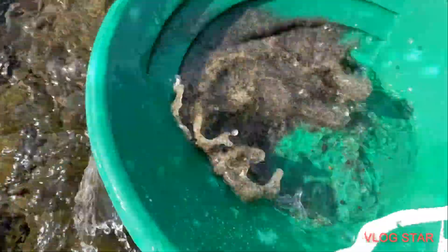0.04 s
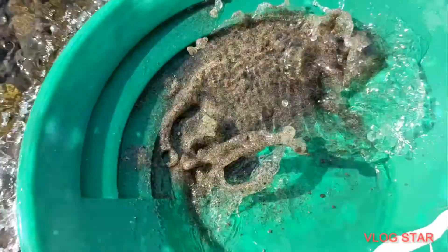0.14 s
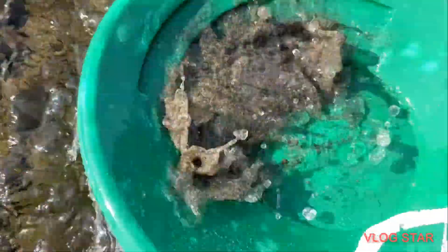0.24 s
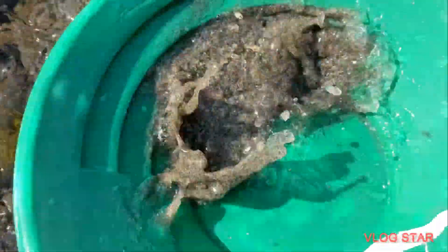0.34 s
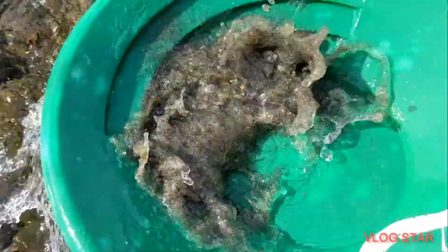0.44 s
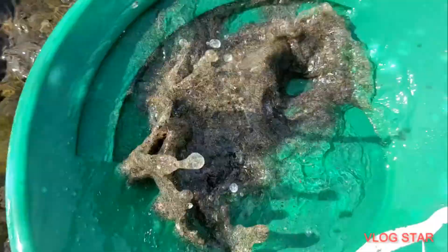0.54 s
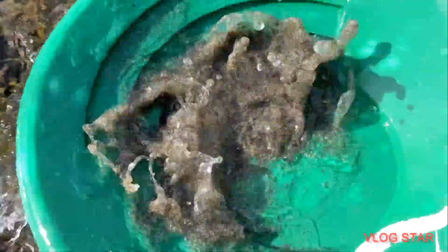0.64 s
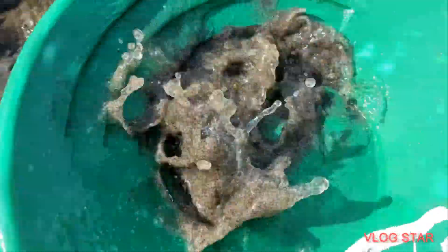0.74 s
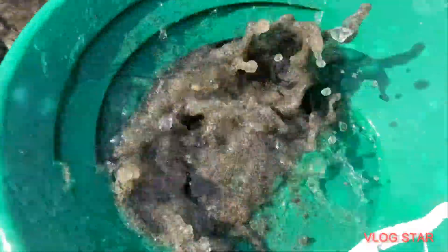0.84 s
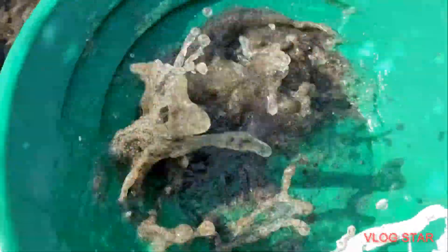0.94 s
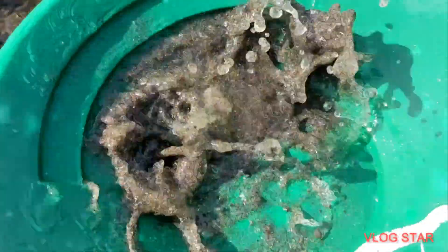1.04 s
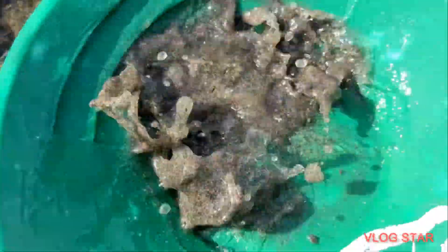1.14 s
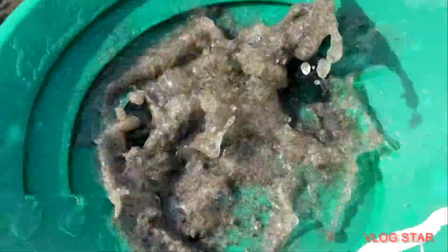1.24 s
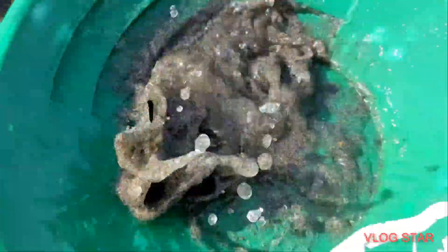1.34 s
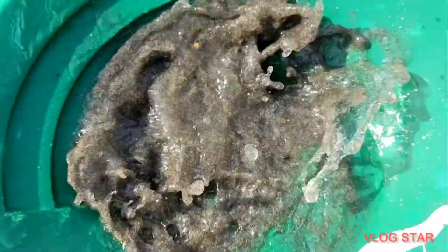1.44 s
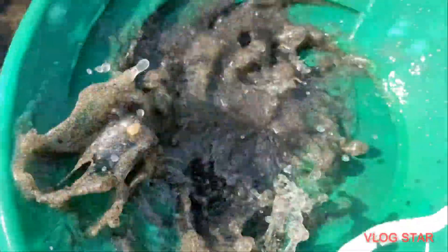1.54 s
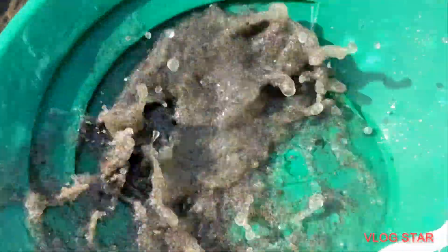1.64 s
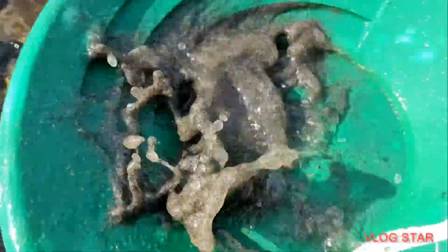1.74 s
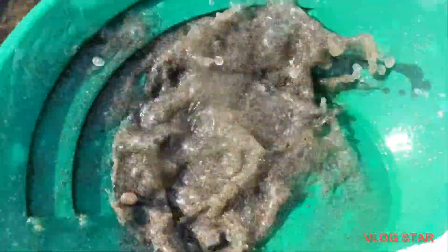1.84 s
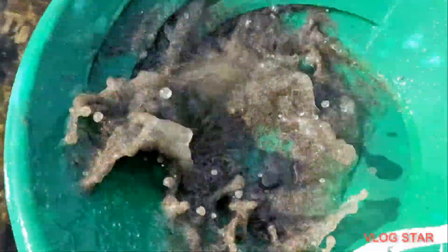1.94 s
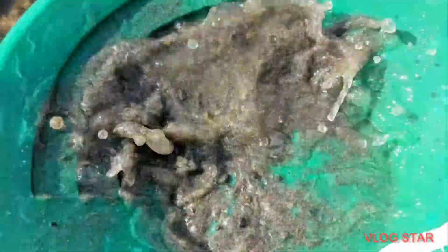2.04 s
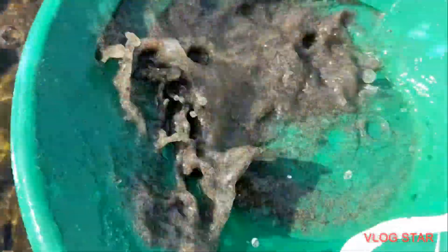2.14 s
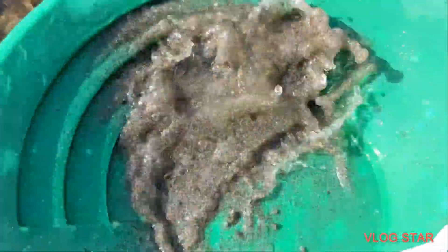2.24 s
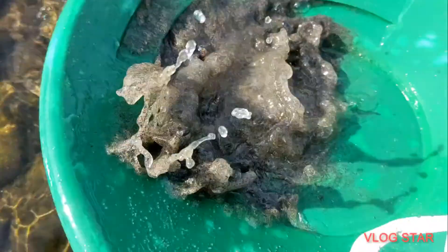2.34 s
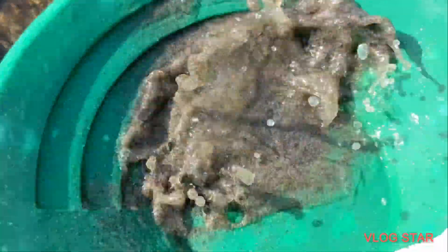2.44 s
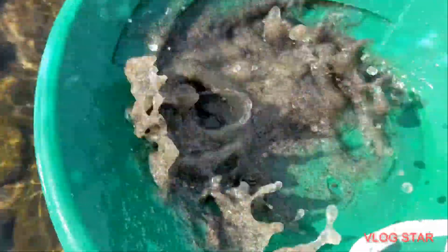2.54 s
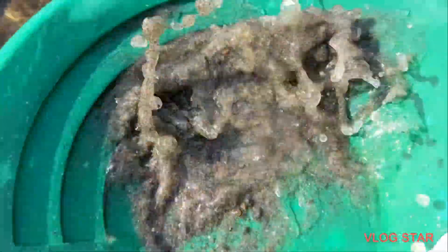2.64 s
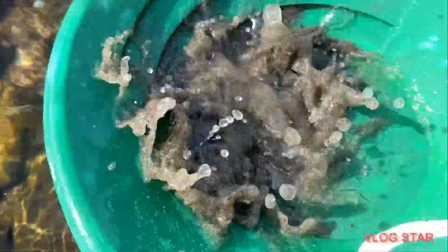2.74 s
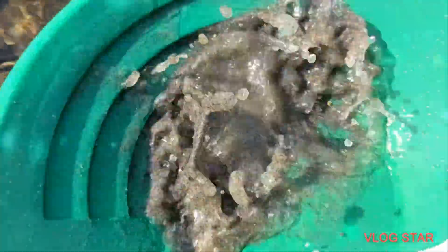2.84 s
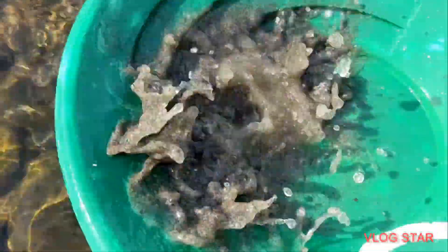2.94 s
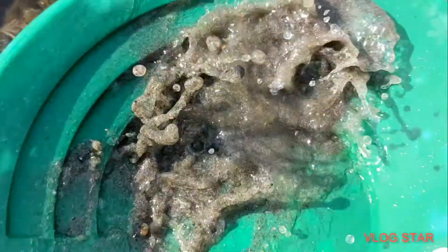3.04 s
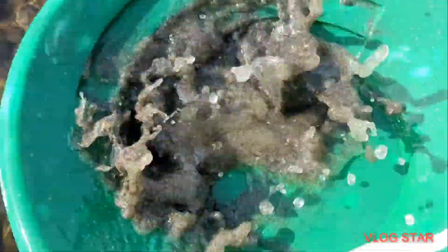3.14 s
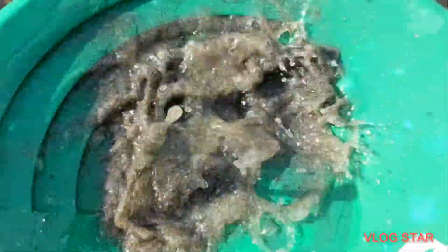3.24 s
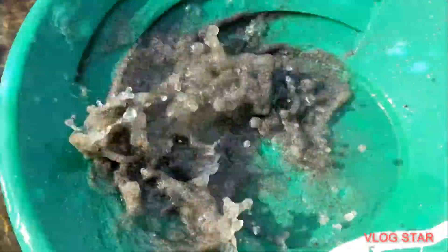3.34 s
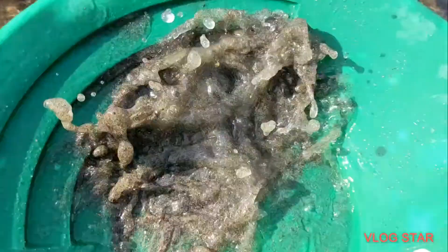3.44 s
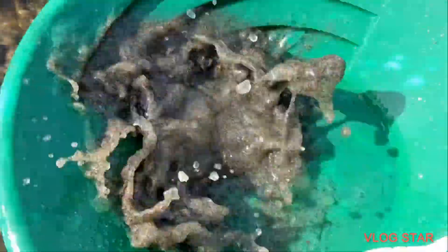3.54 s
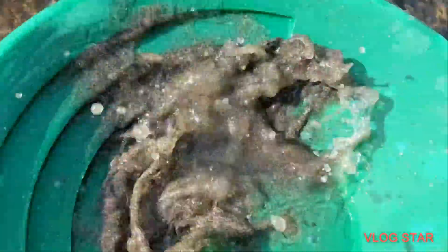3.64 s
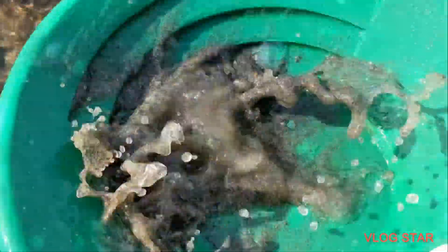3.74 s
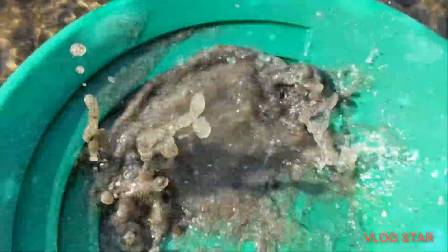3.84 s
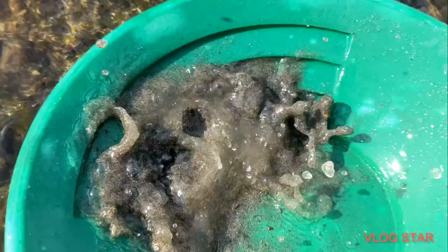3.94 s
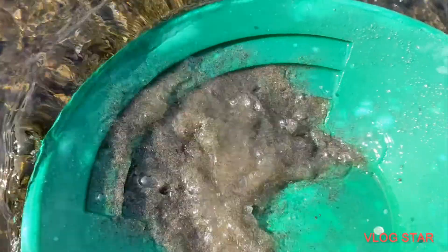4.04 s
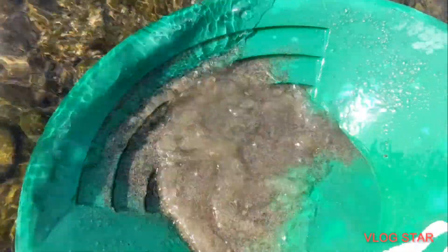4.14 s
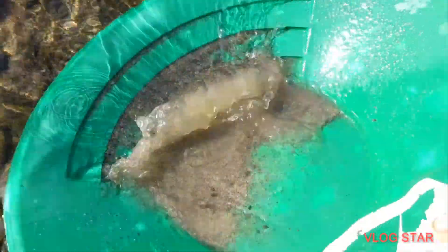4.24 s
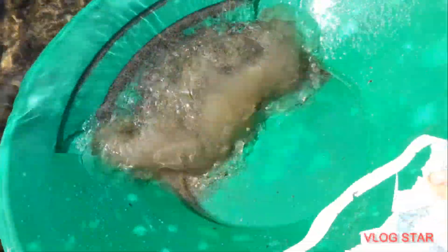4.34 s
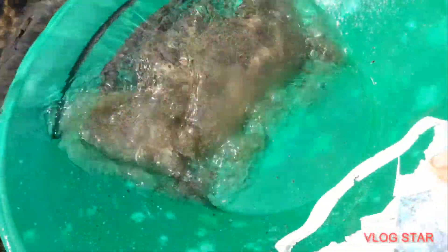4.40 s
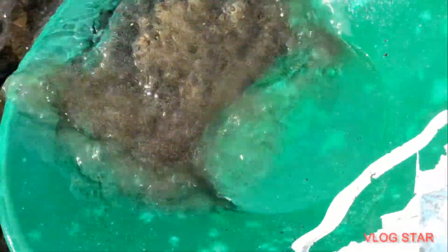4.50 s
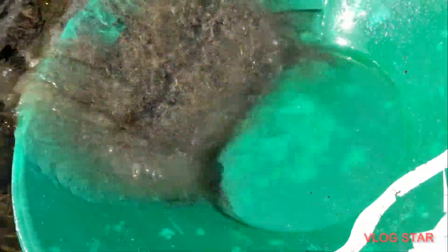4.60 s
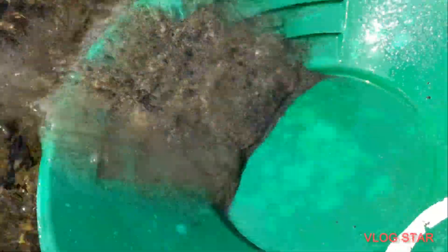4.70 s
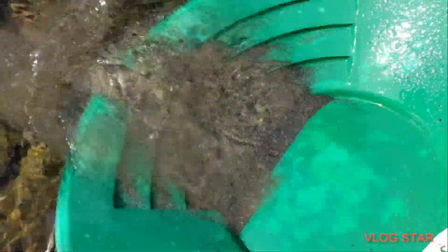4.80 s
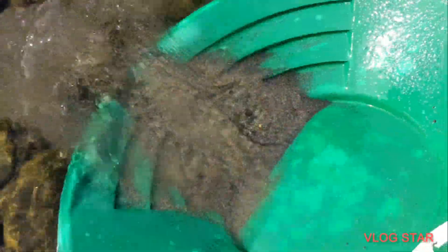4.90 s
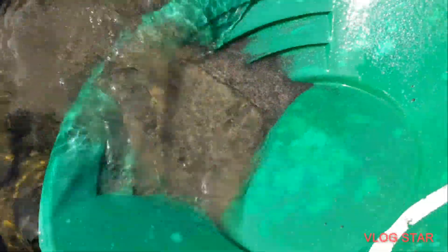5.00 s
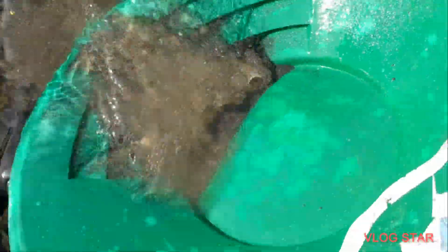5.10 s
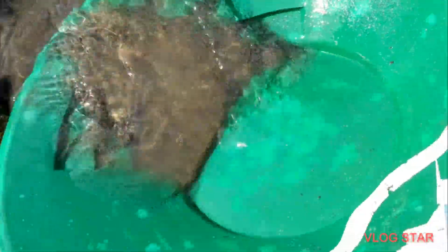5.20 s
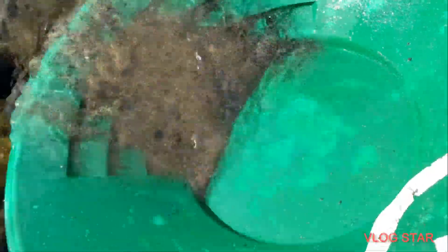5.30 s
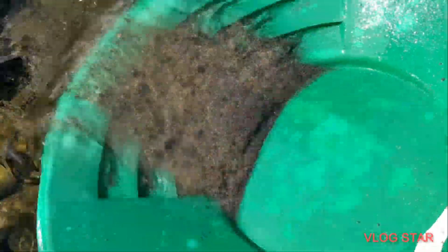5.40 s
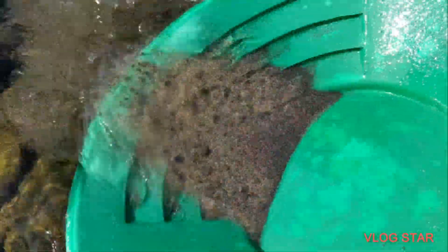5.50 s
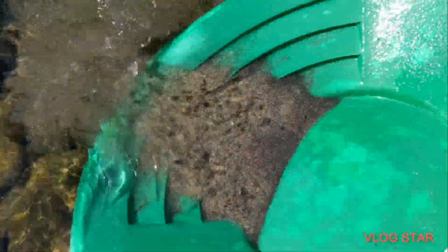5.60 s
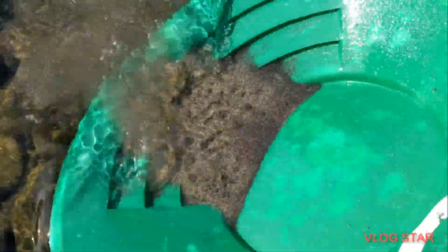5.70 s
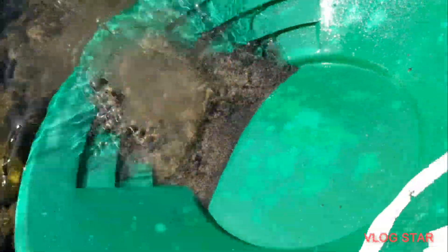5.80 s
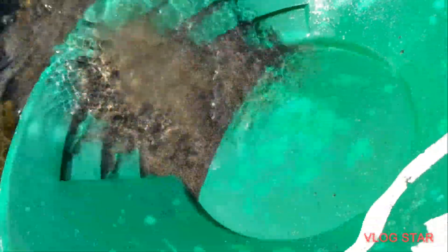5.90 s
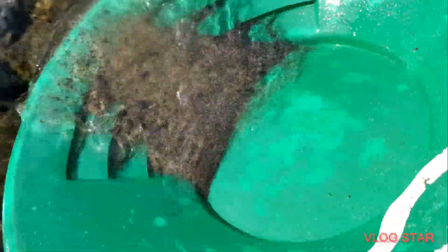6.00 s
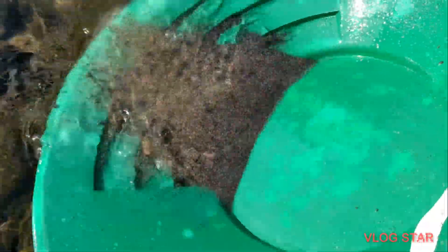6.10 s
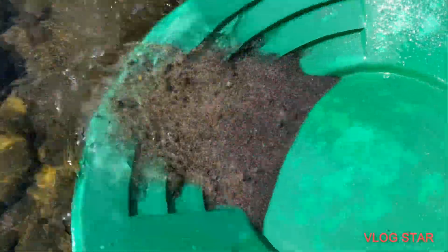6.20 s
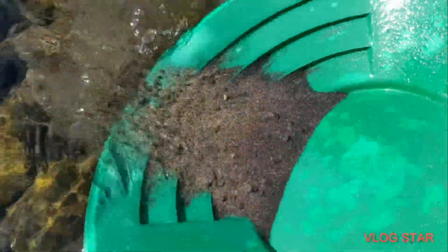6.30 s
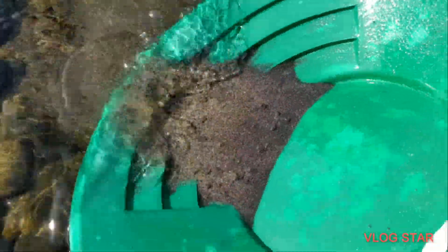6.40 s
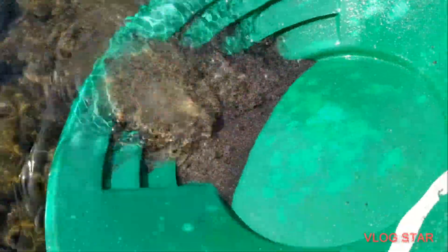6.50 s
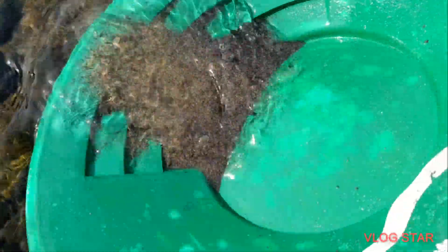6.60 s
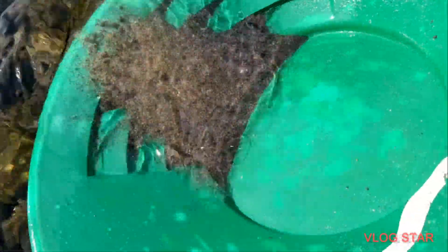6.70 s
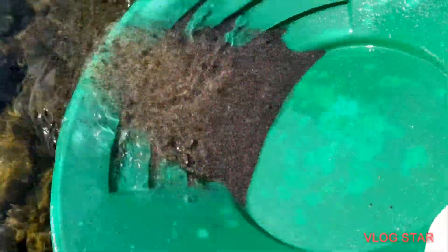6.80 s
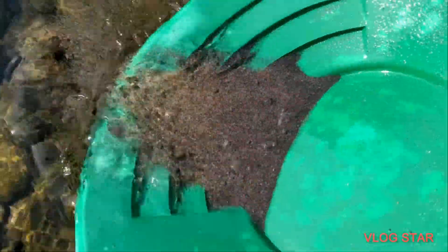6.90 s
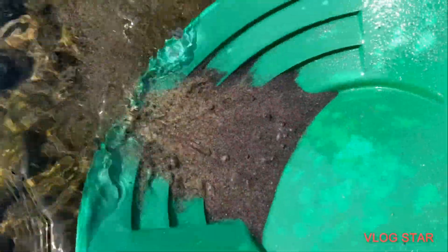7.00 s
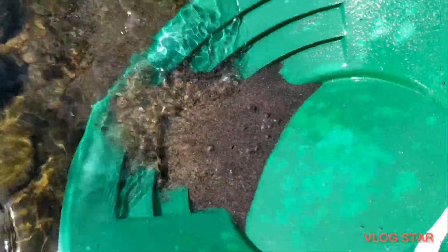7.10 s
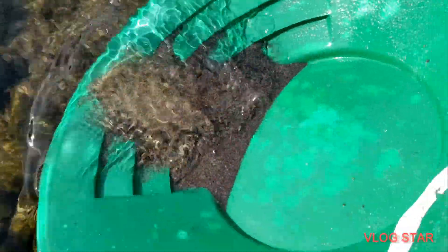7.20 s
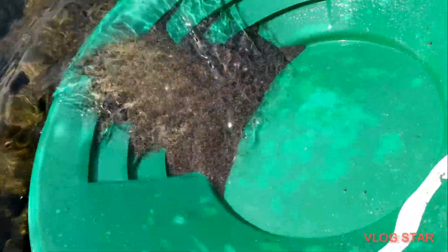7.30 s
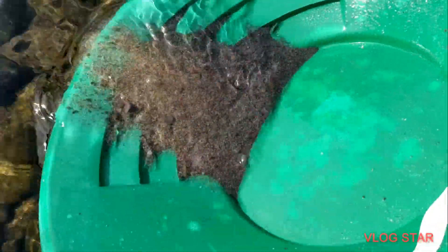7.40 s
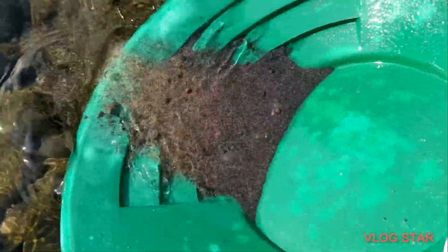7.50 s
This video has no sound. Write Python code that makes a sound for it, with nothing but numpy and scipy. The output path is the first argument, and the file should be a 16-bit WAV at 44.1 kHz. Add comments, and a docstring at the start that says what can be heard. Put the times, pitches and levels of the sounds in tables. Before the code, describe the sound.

Gravelly slurry is shaken hard in a plastic pan, splashing and popping with bubbles, then gently dipped in a hissing river as wind buffets the microphone.

```python
"""A river hisses and a breeze buffets two microphone ports, mostly the right one, as gravelly slurry sloshes.
A plastic gold pan of sand and water is shaken for about four seconds, then dipped gently in the river.
Water and wind are coloured noise; bubbles are short dying tones, single or in swarms.
Slaps, knocks and grit ticks are bursts of noise; hollows under waves give gliding notes."""
import sys
import numpy as np
from scipy import signal
from scipy.io import wavfile
from scipy.ndimage import uniform_filter1d

SR = 44100
rng = np.random.default_rng(int(sys.argv[2]) if len(sys.argv) > 2 else 0)


def store_pcm(level_fs):
    """Save levels as 16-bit WAV."""
    pcm = np.round(np.clip(level_fs, -1, 1) * 32767).astype(np.int16)
    wavfile.write(sys.argv[1], SR, np.atleast_2d(pcm).T)


N = 332947

# Colours of the noise layers. Each row: frequency in Hz, gain in dB.
RIVER_COLOUR = [(150, -12), (480, 8), (850, -2.5), (1150, 11), (1430, -4), (1800, 2), (3000, 1.5),
                (4400, -3.5), (5700, -12), (6800, -3), (8500, -10), (12000, -12), (14000, -12),
                (16000, -14)]
RUMBLE_COLOUR = [(20, -59), (35, -18), (55, -7.5), (80, -1.5), (140, 2), (200, -1), (300, -15.5),
                 (500, -31), (1000, -77.5)]
FLUTTER_COLOUR = [(80, -32.5), (160, -2), (240, 3), (340, -4), (500, -15), (800, -40), (1600, -50)]
LARGE_COLOUR = [(250, -11.5), (420, -7.5), (560, -5), (800, -2.5), (1200, -6.5), (1600, -11.5),
                (2600, -4.5)]
SMALL_COLOUR = [(800, -24.5), (1300, -4.5), (1900, 0.5), (2700, 0), (3800, -2.5), (5000, -11.5),
                (8000, -21)]
SPRAY_COLOUR = [(2800, -4), (4500, 2.5), (6000, 2), (7200, 4.5), (9000, 1.5), (11000, -2), (13500, -3),
                (16000, -3.5)]
SLAP_COLOUR = [(200, -26.5), (420, 3.5), (650, 7), (1300, 3.5), (2100, 3), (3000, 0), (4500, -8.5),
               (8000, -11.5), (16000, -16)]

# Steady breeze on the exposed right port. Each row: time in seconds, wind strength in dB.
BREEZE = [(0, -36), (.3, -45), (.65, -39.5), (.9, -41), (1.2, -39.5), (1.8, -38), (1.95, -44), (2.5, -44),
          (3.0, -37.5), (3.4, -43), (3.9, -40), (4.4, -52.5), (4.65, -54), (5.0, -46.5), (5.4, -38.5),
          (5.8, -42.5), (6.1, -46), (6.5, -45.5), (6.9, -45), (7.15, -46.5), (7.55, -36)]
# Gusts that swell and die on the right port.
# Each row: peak time in seconds, length in seconds, wind strength in dB.
GUSTS = [(0.01, 0.13, -33.5), (0.355, 0.034, -32), (0.549, 0.046, -28), (1.204, 0.12, -34),
         (1.44, 0.12, -34), (1.654, 0.25, -36), (1.813, 0.092, -31), (3.05, 0.051, -28),
         (3.158, 0.076, -34), (3.362, 0.28, -29.5), (3.526, 0.054, -25.5), (3.644, 0.11, -27.5),
         (3.71, 0.039, -31), (4.114, 0.047, -38), (4.407, 0.34, -35.5), (4.76, 0.19, -36.5),
         (4.887, 0.094, -35), (5.128, 0.047, -36.5), (5.197, 0.06, -33), (5.514, 0.21, -49),
         (5.669, 0.12, -26.5), (5.898, 0.11, -39), (5.987, 0.11, -32.5), (6.067, 0.018, -33.5),
         (6.221, 0.16, -31.5), (6.303, 0.13, -35.5), (6.692, 0.13, -41), (7.056, 0.094, -30.5),
         (7.3, 0.44, -36.5)]
# Gusts that reach round to the sheltered left port.
# Each row: peak time in seconds, length in seconds, wind strength in dB.
LEE_GUSTS = [(.04, 0.091, -44), (0.7, 0.074, -48), (3.086, 0.24, -50), (4.15, 0.15, -48),
             (4.428, 0.19, -43), (5.95, 0.82, -53.5), (7.316, 0.13, -50)]
LEE_DB = -61.5  # strength of the steady breeze on the left port
# Sudden eddies on the right port.
# Each row: start in seconds, width of the dying bell curve in seconds, level in dB, first pitch in Hz.
EDDIES = [(0.539, 0.0048, -15.5, 383), (0.55, .006, -20, 229), (1.243, 0.0056, -15, 340),
          (3.283, .005, -18, 360), (3.344, 0.0038, -20, 400), (3.422, 0.0044, -20, 360),
          (3.506, 0.0048, -21, 368), (3.643, 0.0039, -9.5, 467), (3.717, 0.0084, -14, 234),
          (4.098, 0.014, -23, 300), (4.219, 0.0086, -25.5, 260), (4.358, 0.008, -21, 300),
          (4.761, 0.0087, -20, 217), (4.878, 0.013, -18.5, 169), (5.417, 0.0068, -24.5, 400),
          (5.52, 0.0047, -16, 290), (5.655, 0.011, -15.5, 555), (5.673, 0.0058, -19, 556),
          (5.68, 0.013, -14.5, 220), (5.861, 0.0062, -28, 348), (5.964, 0.0074, -20, 298),
          (6.063, 0.007, -15.5, 360), (6.164, 0.0042, -24, 470), (6.18, 0.0046, -25, 490),
          (6.262, 0.005, -23, 470), (6.28, 0.0052, -24, 260), (6.314, 0.0066, -13, 330),
          (6.343, 0.0052, -19.5, 403), (7.328, .005, -29.5, 506)]
EDDY_SAG_PER_S, EDDY_ROUGH = 48, 0.3  # exponential sinking of the pitch, and share of noise

# Each shake sends a surge of slurry across the pan.
# Each row: start in seconds, length in seconds, level in dB, extra large bubbles in dB, extra spray in dB.
SHAKES = [(.02, 0.35, -36.5, -6, 0.5), (.335, 0.14, -37, 2, -3.5), (.48, 0.12, -32, 0, -0.5),
          (.63, 0.18, -37, 3, -2), (.83, 0.17, -40, 9, -2), (1.06, 0.24, -32.5, 0, -1.5),
          (1.27, 0.14, -32.5, -1.5, 0), (1.47, 0.23, -34, 0, 0.5), (1.72, 0.094, -32, -0.5, -0.5),
          (1.885, 0.041, -31.5, -3.5, -2.5), (1.98, 0.058, -31.5, -1, -13), (2.085, 0.13, -38.5, 8.5, -11),
          (2.30, 0.14, -38, 3, -6), (2.53, 0.1, -36, 1, -1.5), (2.70, 0.047, -33, 3, -2),
          (2.78, 0.17, -42, -6, 2), (2.94, 0.127, -35, 3, -6), (3.15, 0.062, -30, 4.5, 3.5),
          (3.235, 0.036, -31.5, 8, 3), (3.29, 0.11, -33.5, -9, 0), (3.43, 0.064, -38.5, -14, 2.5),
          (3.54, 0.23, -32.5, -16, -1.5), (3.74, 0.15, -34, 0.5, -12), (3.945, 0.029, -34, 6.5, 2),
          (4.05, 0.086, -32.5, -11, -13)]
# Each dip lets a thin wave wash over the sand.
# Each row: start in seconds, length in seconds, level in dB, extra large bubbles in dB, extra spray in dB.
DIPS = [(4.16, 0.032, -48, -7, -17), (4.178, 0.16, -54.5, 13, -15), (4.306, 0.093, -43, -6, -5),
        (4.42, 0.11, -52, 7.5, -24), (4.688, 0.17, -50.5, -11, 3.5), (4.852, 0.091, -54.5, -9, 3),
        (5.185, 0.12, -51.5, -3, -3), (5.424, 0.07, -49, -9, -2), (5.582, 0.12, -48.5, -14, -9),
        (5.738, 0.071, -53.5, -1, -1), (5.86, 0.163, -51.5, -16, -0.5), (6.193, 0.21, -52, -18, 0.5),
        (6.444, 0.026, -58.5, 17, -10), (6.927, 0.2, -52.5, -6, 3), (7.18, 0.12, -55, -7, -3)]
# every surge swells fast, climbs slightly and drains away
ATTACK_S, CLIMB_DB_PER_S, RELEASE_S = 0.0027, 4, 0.015
# Moments when the water hangs before it falls back.
# Each row: centre in seconds, depth in dB (negative lifts the level a little).
LULLS = [(.067, 4), (.562, -0.5), (.452, 1.5), (1.035, 0), (1.568, 5), (1.671, 8), (1.845, 4), (2.405, -1),
         (2.485, 7), (3.105, 4), (3.505, 4.5), (4.02, 1.5), (4.113, 4)]
LULL_S = 0.02
SHAKING_ENDS_S, CHURN_DB = 4.16, -39.5  # water keeps moving between shakes
# Water trickling over the riffles; its first level also lies faintly under the shaking.
# Each row: time in seconds, level in dB, extra spray in dB.
TRICKLE = [(4.2, -55, -2.5), (4.45, -50, -10), (4.57, -49.5, -5), (4.63, -50.5, -3), (5.0, -52, 2.5),
           (5.35, -53, -0.5), (5.72, -58, -5), (5.95, -58, -2), (6.2, -57, 7.5), (6.42, -56, -11),
           (6.6, -58, 3.5), (6.8, -56, 5.5), (7.15, -58.5, 0), (7.37, -62, 1), (7.55, -56.5, 3)]
LARGE_DB, SMALL_DB, SPRAY_DB = -3, .5, 1.5  # shares of large bubbles, small bubbles and spray
# sparser air pockets that ring on top of the swarms
PLOPS_PER_S, PLOP_CYCLES, PLOPS_DB = 40, 3.2, -8.5
# small knocks in the moving slurry: rate, decay time, spread of strength and share
KNOCKS_PER_S, KNOCK_S, KNOCK_SPREAD_DB, KNOCKS_DB = 130, .0013, 4.6, -3.5

# Water slapping the wall. Each row: start in seconds, level in dB, decay time in seconds,
# left minus right in dB.
SLAPS = [(0.027, -22.5, 0.0033, 0), (0.345, -24.5, 0.026, 22), (0.423, -35, 0.02, 10),
         (0.515, -25.5, 0.012, 1), (0.57, -26.5, 0.013, -2), (0.763, -27, 0.01, -2), (0.863, -29, 0.057, 2),
         (0.973, -30, .009, 2), (1.341, -21.5, 0.0048, 4), (1.574, -23, 0.0038, -3),
         (1.618, -24, 0.0052, 1), (1.72, -25, 0.0069, -5), (1.76, -20, 0.0039, -9),
         (2.01, -16.5, 0.0057, 6), (2.085, -20.5, 0.0044, -1), (2.098, -20.5, .0046, 7),
         (2.157, -17.5, 0.0054, 2), (2.193, -24.5, 0.0074, 0), (2.235, -23, 0.0033, 1),
         (2.3372, -21.5, 0.0033, -4), (2.378, -20.5, 0.0037, 4), (2.421, -24.5, 0.017, -2),
         (2.435, -26, 0.013, 6), (2.77, -22.5, 0.0051, -2), (3.034, -21.5, 0.0062, -1),
         (3.057, -20.5, 0.0047, 7), (3.185, -18, 0.0086, -7), (3.199, -21, 0.015, 11),
         (3.876, -28, .003, 2), (4.071, -22.5, 0.0053, 1), (4.1219, -14.5, 0.0021, -6),
         (4.146, -29, 0.0072, 3), (4.3108, -32, 0.0027, 0), (4.476, -30.5, 0.0061, 2),
         (4.782, -39, 0.0023, 1), (6.335, -54, 0.0039, 4), (7.0, -37, .003, 5)]
# The loudest single bubbles. Each row: start in seconds, level in dB, starting pitch in Hz,
# decay setting in seconds, left minus right in dB.
BUBBLES = [(0.029, -9, 1390, 0.0016, 5), (0.1, -1.5, 1210, 0.0021, -7), (0.103, -18, 743, 0.006, 6),
           (0.108, -15, 2300, .004, 3), (0.139, -10, 3580, 0.0029, 9), (0.1566, -3.5, 2270, 0.0025, 5),
           (0.1905, -10.5, 3480, 0.0014, 24), (0.2214, -3, 1190, 0.003, 1), (0.299, -23, 1220, .003, 3),
           (0.314, -24, 990, 0.0034, 1), (0.445, -19.5, 1050, 0.0049, 5), (0.344, -5, 2730, 0.0016, 10),
           (0.349, -21, 900, 0.0069, 5), (0.368, -14, 1100, 0.0035, 7), (0.422, -8, 2410, 0.0026, 10),
           (0.5155, -10.5, 1610, 0.0031, -5), (0.523, -17, 2400, 0.0049, 0), (0.5712, -7, 940, 0.0043, 7),
           (0.577, -11, 3200, 0.0016, -1), (0.6655, -9, 1840, 0.0032, 0), (0.699, -12, 1210, 0.0022, -16),
           (0.571, -19, 550, 0.0036, 1), (0.7035, -8.5, 3530, 0.0017, 0), (0.7305, -19, 1507, 0.0014, -4),
           (0.7645, -17, 2410, .002, -2), (0.7702, -18, 792, 0.0078, 4), (0.85, -10.5, 2070, .0018, 3),
           (0.8632, -7, 2290, 0.002, 13), (0.8669, -22, 847, 0.015, 4), (0.9046, -18, 593, 0.0041, 1),
           (0.9716, -14.5, 754, 0.0089, 2), (1.0784, -6.5, 1246, 0.0042, 4), (1.1265, -5, 1100, 0.0026, 8),
           (1.172, -12.5, 1330, 0.003, 5), (1.385, -8, 2300, 0.0011, 1), (1.1735, -19, 690, 0.0065, 2),
           (1.288, -6.5, 2240, 0.0023, 6), (1.343, -5.5, 2140, 0.0017, 4), (1.1445, -15, 1630, 0.0018, 5),
           (1.2345, -14, 2860, .002, 5), (1.386, -19.5, 910, 0.0028, -2), (1.5175, -13, 3150, 0.0017, -2),
           (1.855, -20.5, 1240, 0.0028, 4), (1.902, -9, 2450, 0.0013, -5), (2.0365, -12, 2770, .002, 2),
           (2.0855, -10, 2170, 0.0015, 3), (2.583, -11.5, 2330, 0.0026, 3), (2.852, -18.5, 870, 0.0026, 6),
           (3.0835, -21, 2320, .002, 1), (3.1475, -14, 2690, 0.0016, 6), (3.5245, -15, 2330, 0.0013, 1),
           (1.4497, -15, 1040, 0.0045, 4), (1.72, -2, 3040, 0.00082, 11), (2.01, -6.5, 1364, 0.0024, -17),
           (2.0119, -5, 3000, 0.002, 0), (2.0129, -3.5, 1850, 0.0014, 12), (2.121, -12, 840, 0.0022, 1),
           (2.1587, -9.5, 1260, 0.0019, -9), (2.3353, -8, 1910, 0.0022, 0), (2.422, -4, 2020, 0.0011, 9),
           (2.435, -8, 2000, 0.0018, 17), (2.84, -4, 1460, 0.0011, 1), (2.897, -23, 2950, .0015, 9),
           (2.9177, -10.5, 3100, 0.0052, 15), (3.0317, -14, 780, 0.0035, 11), (3.0589, -8, 1260, 0.0038, 3),
           (3.0637, -8, 700, 0.0013, 2), (3.1673, -6, 2520, .0018, 6), (3.199, -11, 2190, 0.002, 19),
           (3.25, -15, 1080, 0.0023, 3), (3.316, -8, 3700, 0.0018, 7), (3.3508, -15, 3740, 0.005, -5),
           (3.3794, -21, 754, 0.013, 0), (3.585, -17, 898, 0.012, -15), (3.6011, -12, 660, 0.0039, 0),
           (3.6464, -16, 1820, 0.0052, 8), (3.705, -12.5, 866, 0.0043, 5), (3.897, -18, 902, 0.0035, 2),
           (3.909, -13.5, 2060, 0.0037, 10), (4.101, -22, 1700, 0.0019, -2),
           (3.9458, -13.5, 3620, 0.0082, 8), (4.1202, -10.5, 3670, 0.0022, 19),
           (4.1208, 0.5, 2740, 0.00099, -24), (4.1239, -15, 528, 0.0046, -1), (4.125, -2.5, 870, 0.002, 6),
           (4.215, -11, 2100, 0.0014, 4), (4.257, -17, 1420, 0.0016, 6), (4.3105, -18, 1390, 0.0034, 8),
           (4.3444, -30, 1370, .0053, -3), (4.334, -27, 3670, .004, 11), (4.447, -29, 1440, 0.0033, -6),
           (4.378, -18.5, 1780, 0.0046, 3), (4.3775, -23, 3750, .0015, 18), (4.3944, -24, 2680, 0.0022, 18),
           (4.475, -18, 1008, 0.0068, 3), (4.528, -28, 2710, .002, 8), (4.595, -35, 1100, 0.0016, 5),
           (4.677, -30, 2220, .0025, 5), (4.6935, -16, 2800, 0.0015, 1), (4.797, -28, 1690, .005, 8),
           (4.74, -14, 1350, 0.0049, 3), (4.7553, -9.5, 2400, 0.00065, 0), (4.781, -7, 2310, 0.0007, -1),
           (4.806, -24, 1110, 0.0071, 7), (4.8416, -23.5, 1420, 0.0039, 9), (4.873, -26.5, 1200, 0.0049, 8),
           (4.908, -32, 3500, .003, 11), (4.961, -22, 2840, 0.0016, 10), (5.482, -27, 1880, 0.0018, 1),
           (5.1356, -20, 2970, 0.0024, 11), (5.1793, -26.5, 1343, 0.0072, -1),
           (5.571, -22, 2070, 0.0024, -1), (5.6566, -21.5, 4200, 0.0016, 14),
           (5.771, -27.5, 3150, .002, 15), (5.854, -33.5, 1284, 0.0078, 1), (5.831, -32, 3270, .003, 14),
           (5.892, -33, 4260, 0.0049, 2), (5.922, -31, 3440, .003, 6), (6.3, -30, 2000, 0.0033, 6),
           (7.003, -31, 1570, 0.0085, 16), (7.046, -34, 1520, 0.008, 9), (7.07, -28, 3400, 0.0035, 10),
           (7.065, -26, 2560, .0024, 5), (7.102, -26, 3200, 0.0034, 15), (7.122, -33, 760, 0.007, 2),
           (7.273, -24, 2330, 0.0017, 5)]
# a bubble's opening snap and fizzing tail, in dB against the row's level
PINCH_DB, PINCH_S, PINCH_RISE_S = -11, .001, .0005
SPLASH_DB, SPLASH_S = -24.5, .013
# bend of the ring's phase (pitch moves at twice this rate) and its spread, then wobble depth and time
BEND_PER_S, BEND_SPREAD, WOBBLE, WOBBLE_S = -2.5, 2.5, .27, .002
# Hollows under a folding wave. Each row: start in seconds, length in seconds, level in dB,
# first pitch in Hz, last pitch in Hz.
GULPS = [(0.035, 0.019, -31.5, 1460, 2640), (1.083, 0.011, -41, 1220, 1720), (1.453, 0.015, -39, 990, 1360),
         (0.573, 0.023, -29.5, 1064, 1005), (1.908, 0.054, -35, 867, 633),
         (2.261, 0.017, -32.5, 1120, 1600), (2.333, 0.052, -40, 862, 580), (2.53, 0.047, -34.5, 850, 604),
         (2.95, 0.048, -32.5, 868, 664), (3.189, 0.045, -29, 920, 523), (3.561, 0.054, -32.5, 641, 471),
         (3.567, 0.046, -39, 1095, 885), (3.764, 0.073, -37, 1043, 811), (3.778, 0.04, -38, 621, 490),
         (5.19, 0.036, -47, 1220, 2380), (5.567, 0.052, -52, 890, 970), (6.976, 0.0091, -41.5, 735, 626),
         (6.983, 0.022, -46, 644, 1570), (7.036, 0.029, -56, 1360, 1930)]
# The loudest grit and drops ticking on the pan. Each row: start in seconds, starting level in dB,
# centre in Hz, left minus right in dB.
TICKS = [(0.221, -15.5, 9600, 1), (0.3463, -10, 11100, -3), (0.624, -16, 13800, -14), (0.8346, -7, 7750, 0),
         (0.046, -17, 7400, -4), (0.208, -17.5, 6040, 1), (0.411, -17, 4020, 11), (0.544, -18, 7190, -5),
         (0.645, -17.5, 14400, -7), (0.7265, -16.5, 6770, -13), (1.05, -19.5, 4070, -2),
         (1.331, -17, 4240, -1), (2.44, -18, 5700, -12), (2.694, -18.5, 6980, 1), (3.845, -15.5, 8110, 0),
         (0.9484, -17.5, 6100, 3), (1.4245, -19, 12900, -8), (1.675, -17, 5700, 8),
         (3.1438, -17.5, 13200, -1), (1.3432, -17.5, 5900, 1), (1.5875, -15.5, 8250, -2),
         (1.6214, -15, 5900, 1), (1.721, -6.5, 7250, -2), (1.773, -8, 8650, 0), (1.8598, -17, 10200, 19),
         (1.981, -17.5, 7850, 2), (2.0117, -27, 3480, 0), (2.3766, -17.5, 5800, -3),
         (2.1126, -13, 5570, -2), (2.737, -15.5, 9650, -4), (2.838, -15, 11500, -8),
         (2.9795, -24, 10400, -5), (3.0002, -12, 7200, 2), (3.355, -6, 6570, -2), (3.364, -10, 5830, 11),
         (3.377, -14, 4900, 2), (3.551, -19, 6900, 2), (4.097, -21, 5530, 7), (0.27, -21, 4240, -7),
         (1.412, -16.5, 6160, -3), (1.48, -19, 7840, -6), (2.67, -17, 7240, 2), (3.9492, -8, 6360, 2),
         (3.952, -17, 5800, 0), (4.1243, -17, 3900, 16), (4.214, -23, 7200, 20), (4.31, -23, 7860, 3),
         (4.405, -31, 14800, -4), (4.7405, -28, 14000, -4), (4.476, -24, 4530, 11), (4.693, -28, 8200, -7),
         (4.754, -21.5, 11700, -9), (4.7796, -22.5, 6200, -3), (4.8344, -23, 11300, -1),
         (5.2667, -35, 12600, -7), (5.5182, -27, 14300, -7), (5.565, -23.5, 5700, 0),
         (5.6034, -28.5, 10200, 3), (5.653, -27, 5400, 5), (5.769, -36, 4400, 0), (5.835, -37, 15000, -6),
         (6.094, -36, 7200, 1), (6.1745, -29, 7450, -2), (6.2515, -36, 7100, 0), (6.264, -30.5, 5590, 1),
         (6.277, -37, 4960, -6), (6.3215, -35, 6000, 6), (6.371, -30, 8500, -2), (6.453, -35, 8250, 6),
         (6.461, -35, 8600, 12), (6.936, -42, 4310, 8), (7.092, -31, 7580, 2), (6.3078, -21.5, 6500, 0),
         (6.3477, -25, 12500, -5), (6.3661, -20.5, 6900, 3), (6.4915, -27, 10400, 5), (6.967, -27, 5100, 2),
         (7, -26.5, 7460, -1), (7.043, -44, 5000, 0), (7.054, -28.5, 6750, 1), (7.07, -39, 5500, -2)]
CRACK_S, PATTER_S, PATTER = 0.00065, 0.0073, 0.083  # decay of a tick, then decay and share of its patter

EDGE_HZ = 16000  # low-pass cutoff of the finished sound


def amp(db):
    """Gain for a level in dB."""
    return 10 ** (np.asarray(db) / 20)


def evened(x):
    """Scale a sound to unit RMS."""
    return x / np.sqrt(np.mean(x ** 2) + 1e-20)


def follow(table):
    """Every column of a curve table, sample by sample."""
    s, *columns = np.transpose(table)
    return [np.interp(np.arange(N) / SR, s, c) for c in columns]


def sides(pan_db):
    """Left and right gains of constant power."""
    pair = np.array([amp(pan_db / 2), amp(-pan_db / 2)]).reshape(2, -1)
    return pair / np.sqrt(np.mean(pair ** 2, axis=0))


def add(mix, s, sound):
    """Lay a sound into the mix at the given second, cut off at the end."""
    part = mix[:, max(round(s * SR), 0):][:, :sound.shape[1]]
    part += sound[:, :part.shape[1]]


def colour(x, spectrum, size=4096):
    """Causal minimum-phase filter with the given spectrum, so that clicks keep their sharp start."""
    hz, db = np.transpose(spectrum)
    bins_hz = abs(np.fft.fftfreq(size, 1 / SR)) + 1
    log_gain = np.log(amp(np.interp(np.log(bins_hz), np.log(hz), db)))
    response = np.exp(np.conj(signal.hilbert(log_gain)))
    taps = np.fft.ifft(response).real[:size // 2]
    return signal.oaconvolve(x, taps[None], axes=1)[:, :x.shape[1]]


def noise_pair(likeness, size):
    """White noise at two ports, partly shared."""
    a, b = rng.standard_normal((2, size))
    c = np.clip(likeness, -1, 1)
    return np.array([a, c * a + np.sqrt(1 - c * c) * b])


def unsteady(seconds):
    """Slow random drift of unit RMS that changes over the given time."""
    size = max(int(seconds * SR), 3)
    smooth = uniform_filter1d(rng.standard_normal(N), size)
    return evened(uniform_filter1d(smooth, size // 3))


def ring(hz, decay, rise, bend, lag, size=2000):
    """A bubble's dying tone at both ports: it rings briefly, then is choked as the film breaks."""
    late = np.array([[max(lag, 0)], [max(-lag, 0)]])  # a positive lag delays the left port
    t = np.maximum(np.arange(size) / SR - late, 0)
    fade = 0.68 * np.exp(-(t / (1.6 * decay)) ** 1.3) + .07 * np.exp(-t / (2.5 * decay))
    return np.sin(2 * np.pi * hz * t * (1 + bend * t)) * fade * (1 - np.exp(-t / rise))


def swarm(low_hz, high_hz, per_s, cycles, spread_db, count=26):
    """Many little bubbles: tones of stepped pitch, each scattered at random times and strengths."""
    out, born = np.zeros((2, N)), int(per_s * N / SR / count)
    for k, hz in enumerate(np.geomspace(low_hz, high_hz, count)):
        starts = rng.integers(0, N, (born, 1))
        # most are faint, a few stand out
        sizes = amp(spread_db * np.minimum(rng.exponential(1, (born, 1)), 3.5))
        decay = cycles / hz * rng.uniform(.7, 1.6)
        bend, lag = rng.uniform(-0.5, 3.8), rng.uniform(-0.000087, 0.000335)
        tone = ring(hz, decay, 1 / hz, bend, lag, size=int(5 * decay * SR))
        # neighbouring pitches lean to opposite sides
        tone = tone / np.linalg.norm(tone) * np.sqrt(hz) * sides(8 * (-1) ** k * rng.random())
        places = (starts + np.arange(tone.shape[1])).ravel()
        out += [np.bincount(places, (sizes * port).ravel(), N)[:N] for port in tone]
    return evened(out)


def river():
    """The hiss of the current: gently drifting coloured noise with small bubbling trickles in it."""
    trickles = swarm(700, 9000, per_s=500, cycles=4, spread_db=3.5, count=20)
    flow = noise_pair(.1, N) + .3 * trickles
    return evened(colour(flow, RIVER_COLOUR)) * amp(-49.5 + .5 * unsteady(0.066)) * sides(1.0)


def gusting(steady_db, table):
    """Wind strength at one port: a steady breeze with smooth gusts added in power."""
    power = np.ones((1, N)) * amp(steady_db) ** 2
    for s, length, db in table:
        from_peak = np.clip((np.arange(N) / SR - s) / length, -.5, .5)
        power += (amp(db) * np.cos(np.pi * from_peak)) ** 2
    return np.sqrt(power[0])


def wind():
    """Unrelated turbulence at each port; flutter outgrows rumble, so stronger gusts sound brighter."""
    strength = np.array([gusting(LEE_DB, LEE_GUSTS), gusting(follow(BREEZE)[0], GUSTS)])
    buffets = amp(3.8 * unsteady(.012))
    rumble = evened(colour(noise_pair(0, N), RUMBLE_COLOUR))
    rumble = rumble * strength ** 0.83 * amp(-2.0 + 2.23 * unsteady(0.03))
    flutter = evened(colour(noise_pair(0, N), FLUTTER_COLOUR))
    flutter = flutter * strength ** 1.304 * amp(10.0) * buffets
    return rumble + flutter + eddies()


def surges(table):
    """Strength of large bubbles, small bubbles and spray: each surge swells, climbs and drains away."""
    t, power = np.arange(SR) / SR, np.zeros((3, N))
    for s, length, db, large_db, spray_db in table:
        drain = np.exp(-np.maximum(t - length, 0) / RELEASE_S)
        shape = np.minimum(t / ATTACK_S, 1) * amp(CLIMB_DB_PER_S * t) * drain
        add(power, s, np.outer(amp([db + large_db, db, db + spray_db]), shape) ** 2)
    return np.sqrt(power)


def lulls():
    """Gain of the slosh: it mostly drops for a moment where the water hangs."""
    t = np.arange(N) / SR
    return amp(-sum(db * np.exp(-((t - s) / LULL_S) ** 2) for s, db in LULLS))


def knocks(count=8):
    """Lumps of slurry and gravel knock on the wet plastic at random, each a short dull burst."""
    out, t = np.zeros((2, N)), np.arange(int(6 * KNOCK_S * SR)) / SR
    for _ in range(count):
        strengths = amp(KNOCK_SPREAD_DB * np.minimum(rng.exponential(1, N), 2))
        hits = (rng.random(N) < KNOCKS_PER_S / count / SR) * strengths
        burst = noise_pair(.7, len(t)) * np.sqrt(t / KNOCK_S) * np.exp(-t / KNOCK_S)
        out += signal.oaconvolve(hits[None], burst, axes=1)[:, :N]
    return evened(colour(out, SLAP_COLOUR))


def slosh():
    """Swarms of bubbles, small knocks and sandy spray over a turbulent wash, all surging in short spurts."""
    shaking = np.exp(-np.maximum(np.arange(N) / SR - SHAKING_ENDS_S, 0) / RELEASE_S)
    trickle_db, fizz_db = follow(TRICKLE)
    between = amp(CHURN_DB) * shaking + amp([trickle_db, trickle_db, trickle_db + fizz_db])
    large_gain, small_gain, spray_gain = np.hypot(surges(SHAKES + DIPS), between) * lulls()
    spurts = unsteady(0.015)

    # bursting films give broad, tiny snaps
    snap_sizes = amp(3.5 * np.minimum(rng.exponential(1, N), 3))
    snaps = evened((rng.random(N) < 350 / SR) * rng.standard_normal((2, N)) * snap_sizes)

    large = swarm(480, 1700, per_s=520, cycles=2.7, spread_db=3.2) + .6 * noise_pair(.45, N)
    small = swarm(1200, 5200, per_s=1000, cycles=2.8, spread_db=3.8) + .72 * noise_pair(.1, N) + .5 * snaps
    spray = swarm(3800, 15500, per_s=1400, cycles=4.5, spread_db=5.5) + 1.15 * noise_pair(0, N) + .8 * snaps
    plops = swarm(650, 4000, per_s=PLOPS_PER_S, cycles=PLOP_CYCLES, spread_db=2.5)
    return (evened(colour(large, LARGE_COLOUR)) * large_gain * amp(LARGE_DB + 2.0 * spurts) * sides(1.0)
            + evened(colour(small, SMALL_COLOUR)) * small_gain * amp(SMALL_DB + 0.23 * spurts) * sides(4.4)
            + evened(colour(spray, SPRAY_COLOUR)) * spray_gain * amp(SPRAY_DB + 2.2 * spurts) * sides(-.3)
            + knocks() * small_gain * amp(KNOCKS_DB) * sides(1.7)
            + plops * small_gain * amp(PLOPS_DB) * sides(4.3))


def slaps(size=2400):
    """Each slap is a short burst of noise coloured by the wet plastic."""
    out, t = np.zeros((2, N)), np.arange(size) / SR
    for s, db, decay, pan_db in SLAPS:
        burst = colour(noise_pair(0.36, size) * np.exp(-t / decay), SLAP_COLOUR)
        # longer slaps carry more energy
        add(out, s, amp(db) * sides(pan_db) * evened(burst) * np.sqrt(decay / t[-1]))
    return out


def bubbles(size=2600):
    """An air pocket pinches off with a snap, rings with a wobbling glide and leaves a short splashy fizz."""
    out, t = np.zeros((2, N)), np.arange(size) / SR
    swell = 1 - np.exp(-(t / PINCH_RISE_S) ** 2)
    splash = swell * (amp(PINCH_DB) * np.exp(-t / PINCH_S) + amp(SPLASH_DB) * np.exp(-t / SPLASH_S))
    for s, db, hz, decay, pan_db in BUBBLES:
        bend = BEND_PER_S + BEND_SPREAD * rng.uniform(-0.96, 1)
        rough = rng.standard_normal((2, size))
        wobble = evened(uniform_filter1d(rough, int(WOBBLE_S * SR), mode="wrap"))
        tone = ring(hz, decay, rise=0.00064, bend=bend, lag=0.00015, size=size) * (1 + WOBBLE * wobble)
        # the fizz is noise centred a little above the ring
        band = [(hz / 4, -26), (hz * .7, -4), (hz * 1.2, 0), (hz * 2.2, -8), (hz * 5, -26), (hz * 10, -42)]
        fizz = evened(colour(noise_pair(0.14, size), band, size=512))
        add(out, s, amp(db) * sides(pan_db) * (tone + fizz * splash))
    return out


def gulps():
    """A hollow under a wave sounds a fuzzy note that glides down or up, its pitch and level wobbling."""
    out = np.zeros((2, N))
    for s, length, db, first_hz, last_hz in GULPS:
        size = int(length * SR)
        wobble = evened(uniform_filter1d(rng.standard_normal(SR), 150))[:size]
        pitch_hz = np.linspace(first_hz, last_hz, size) * (1 + .04 * wobble)
        turns = np.cumsum(pitch_hz) / SR
        note = np.sin(2 * np.pi * turns) * (1 + .35 * wobble) * signal.windows.tukey(size, .7)
        add(out, s, amp(db) * sides(0.84) * evened(note))
    return out


def ticks(size=900):
    """Grit or a drop gives a hard crack about a millisecond long, with a faint patter after it."""
    out, t = np.zeros((2, N)), np.arange(size) / SR
    fade = (np.exp(-t / CRACK_S) + PATTER * np.exp(-t / PATTER_S)) * (1 - np.exp(-t / 0.0005))
    loudness = np.sqrt(np.mean(fade ** 2)) / fade.max()
    for s, db, hz, pan_db in TICKS:
        band = [(hz / 8, -32), (hz / 2, -13), (hz, 0), (hz * 2, -15)]
        crack = colour(noise_pair(0.015, size), band, size=512) * fade
        add(out, s, amp(db) * sides(pan_db) * evened(crack) * loudness)
    return out


def eddies(size=2400):
    """An eddy thumps the right port: a sudden rough push whose pitch sinks as it dies."""
    out, t = np.zeros((2, N)), np.arange(size) / SR
    for s, decay, db, hz in EDDIES:
        push = np.sin(2 * np.pi * np.cumsum(hz * np.exp(-EDDY_SAG_PER_S * t)) / SR)
        band = [(hz / 4, -3), (hz, 0), (hz * 2, -14), (hz * 4, -45), (hz * 8, -70)]
        swirl = evened(colour(noise_pair(0, size), band, size=1024))[0]
        shape = (1 - np.exp(-(t * hz * 2) ** 2)) * np.exp(-(t / decay) ** 2 / 2)
        add(out, s, amp(db) * np.outer([0, 1], (push + EDDY_ROUGH * swirl) * shape))
    return out


def scene():
    """River and wind around the pan, with all the sounds of its water and grit."""
    grit = ticks()
    # a little of each tick reaches the far port too
    grit = grit + .12 * grit[::-1]
    return river() + wind() + slosh() + slaps() + bubbles() + gulps() + grit


def record(dry):
    """Each port has its own treble colour; a low cut, then a steep low-pass."""
    left_colour = [(1000, -4.0), (4500, -4.5), (7500, -7.5), (10000, -5.5), (14000, -6.5)]
    right_colour = [(1000, -4.0), (4500, -6.0), (7500, -6.5), (10000, -12.0), (14000, 0.0)]
    both = np.vstack([colour(dry[:1], left_colour, size=512), colour(dry[1:], right_colour, size=512)])
    both = signal.sosfilt(signal.butter(3, 42, "high", fs=SR, output="sos"), both)
    edge = signal.firwin(601, EDGE_HZ, window=("kaiser", 8), fs=SR)
    return signal.oaconvolve(both, edge[None], "same", axes=1)


dry = scene()
out = record(dry)
store_pcm(out)
```